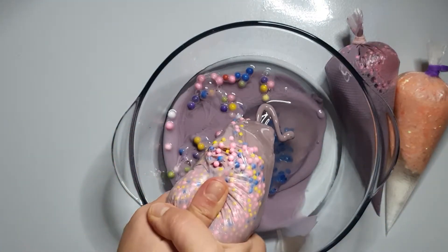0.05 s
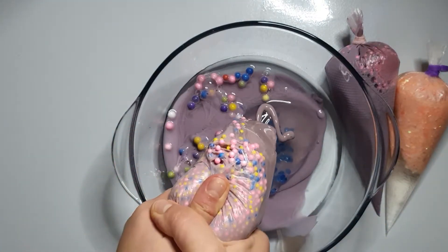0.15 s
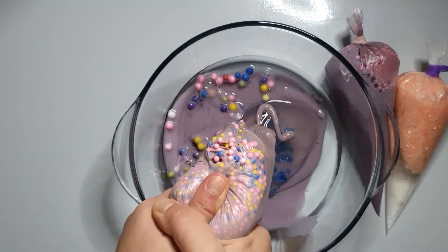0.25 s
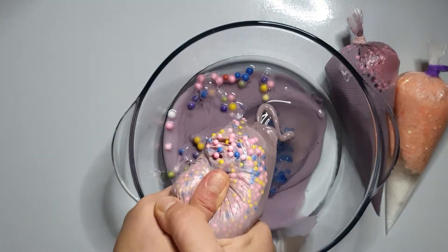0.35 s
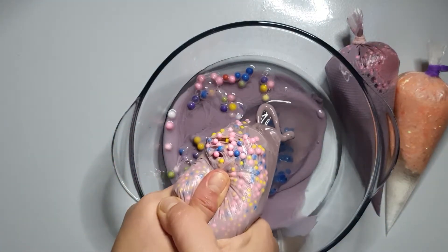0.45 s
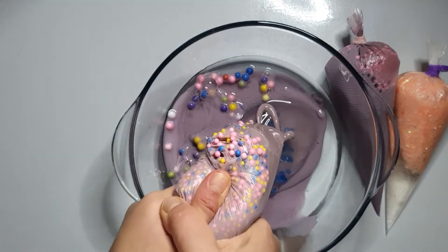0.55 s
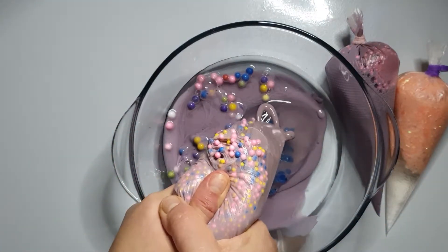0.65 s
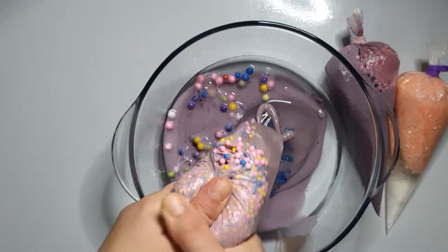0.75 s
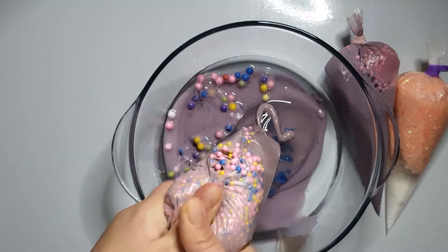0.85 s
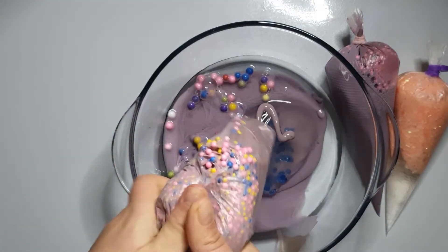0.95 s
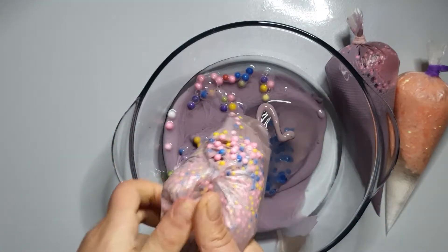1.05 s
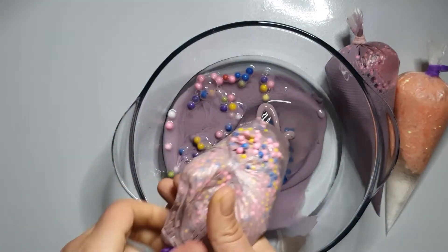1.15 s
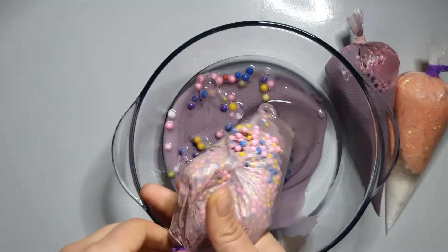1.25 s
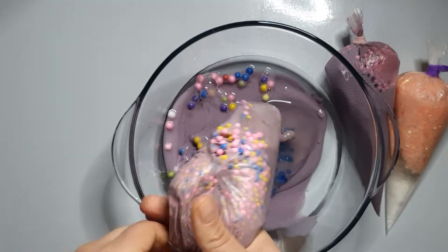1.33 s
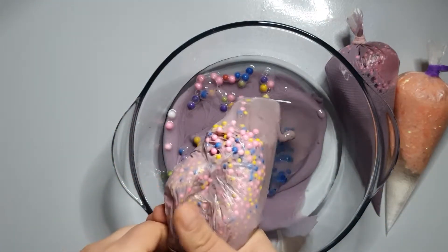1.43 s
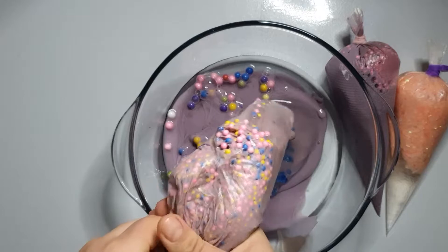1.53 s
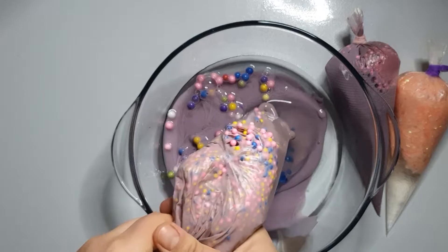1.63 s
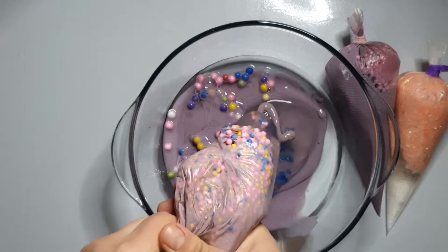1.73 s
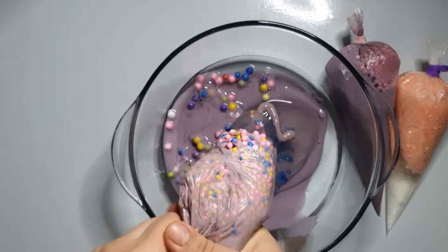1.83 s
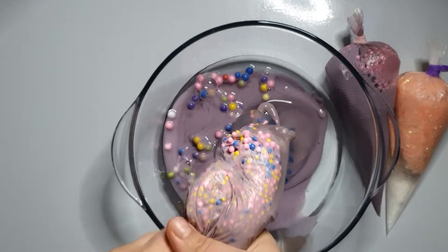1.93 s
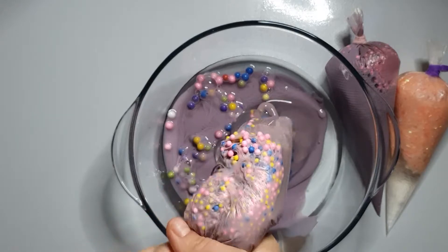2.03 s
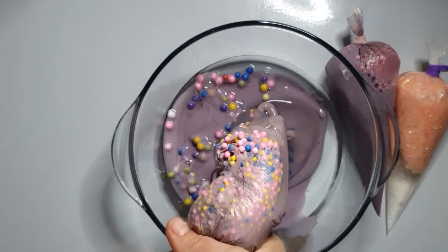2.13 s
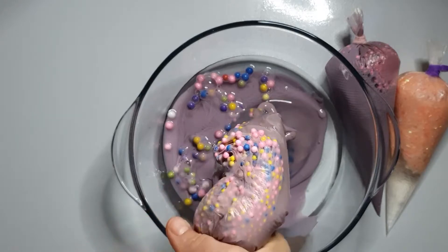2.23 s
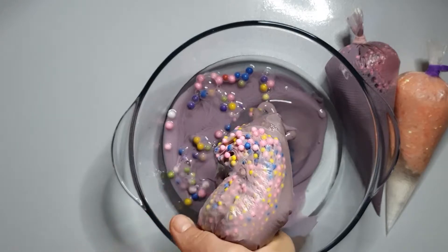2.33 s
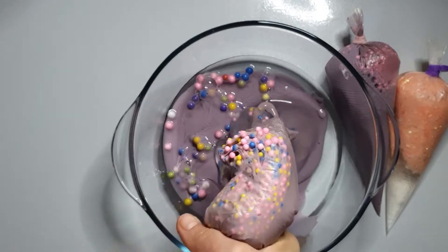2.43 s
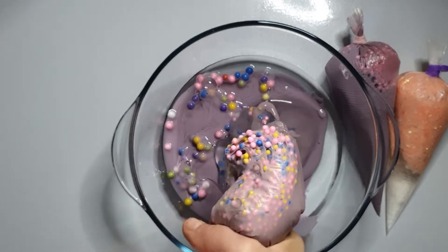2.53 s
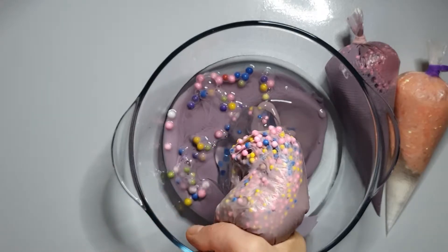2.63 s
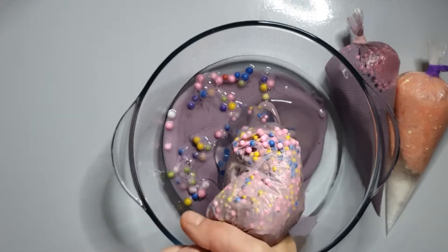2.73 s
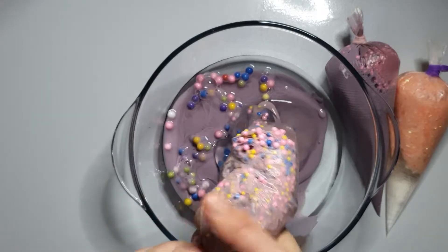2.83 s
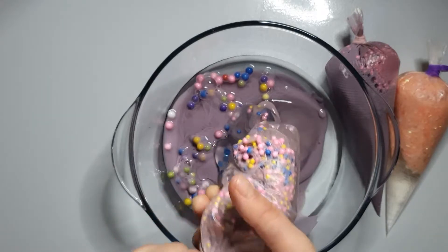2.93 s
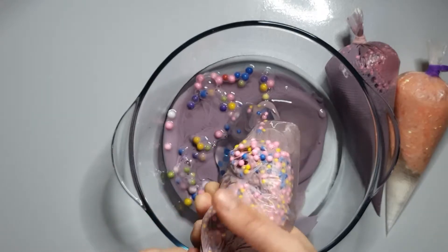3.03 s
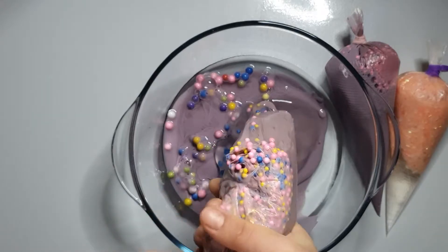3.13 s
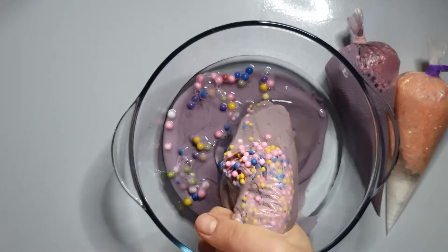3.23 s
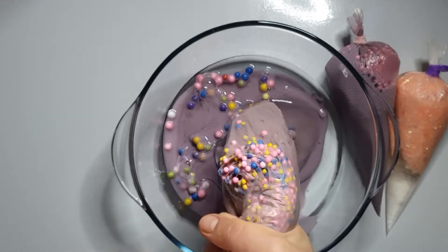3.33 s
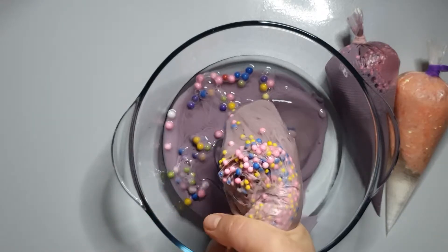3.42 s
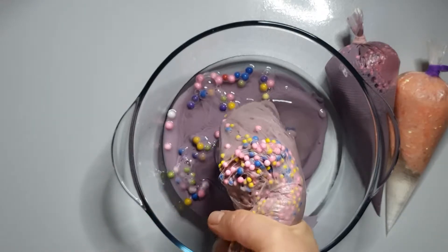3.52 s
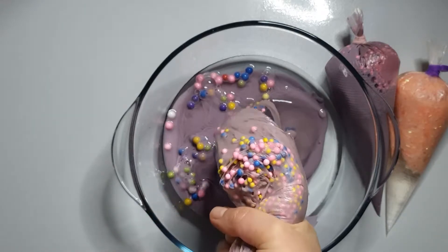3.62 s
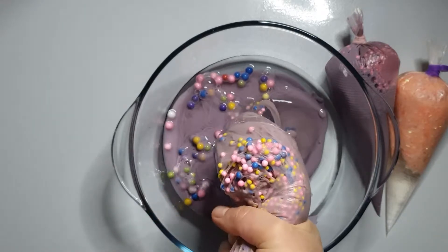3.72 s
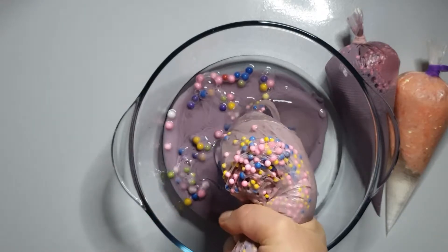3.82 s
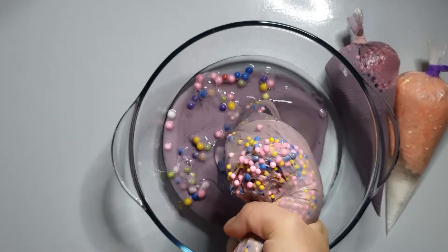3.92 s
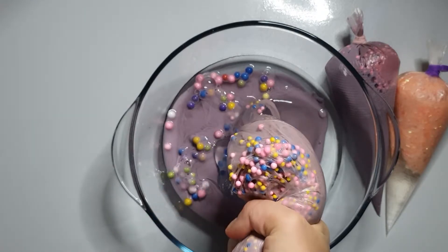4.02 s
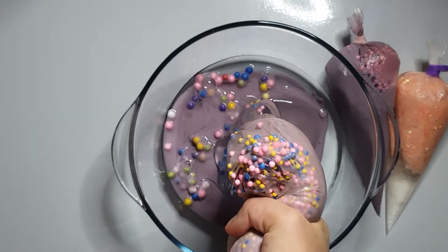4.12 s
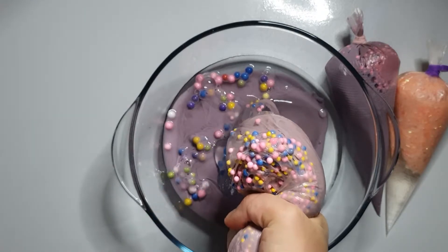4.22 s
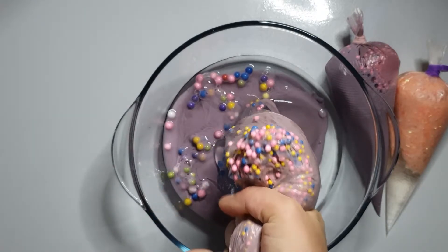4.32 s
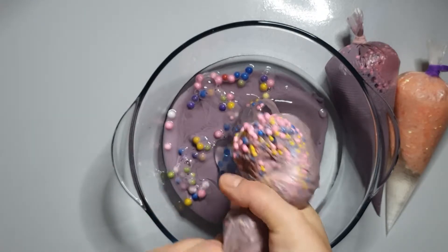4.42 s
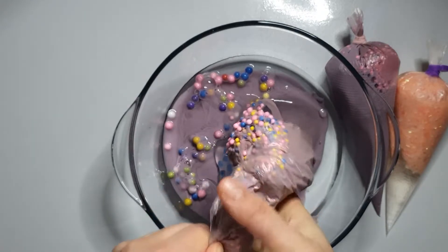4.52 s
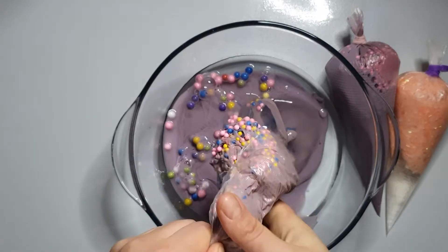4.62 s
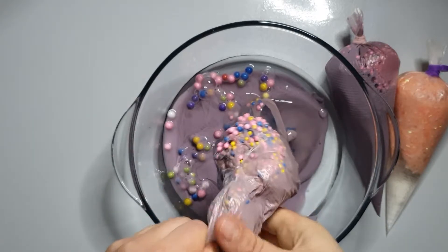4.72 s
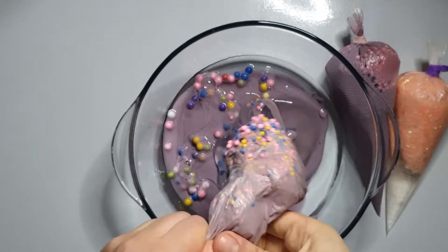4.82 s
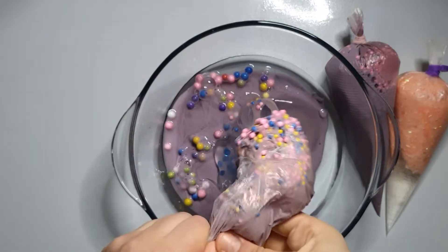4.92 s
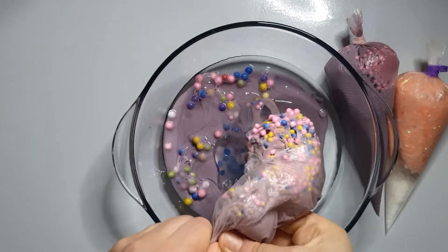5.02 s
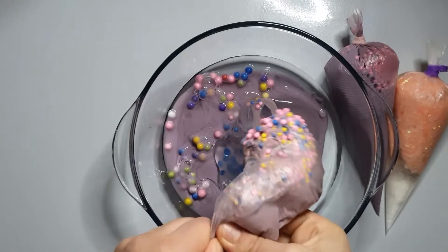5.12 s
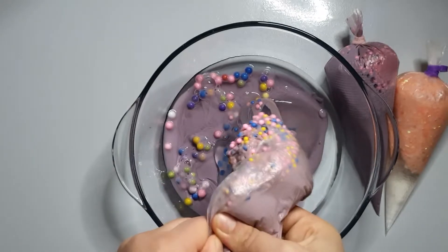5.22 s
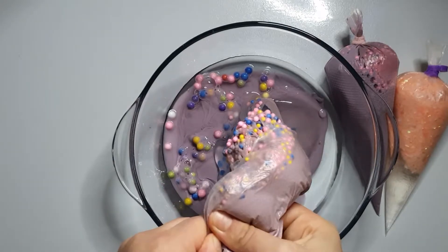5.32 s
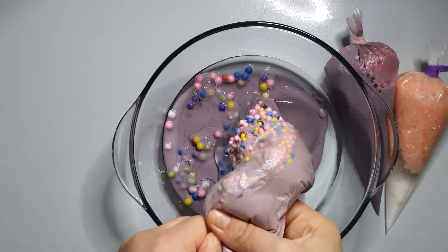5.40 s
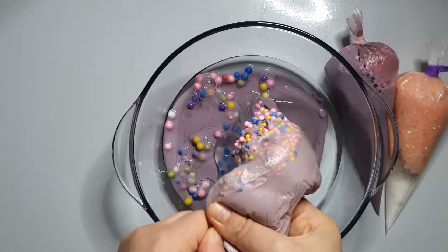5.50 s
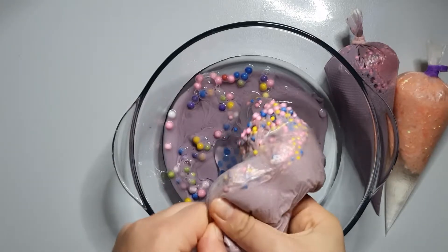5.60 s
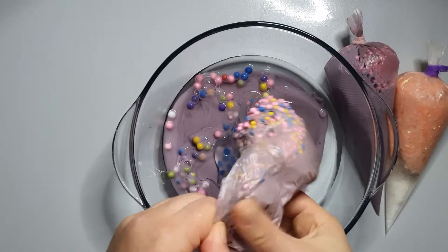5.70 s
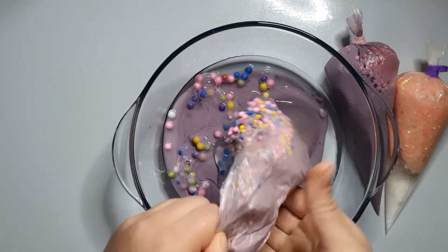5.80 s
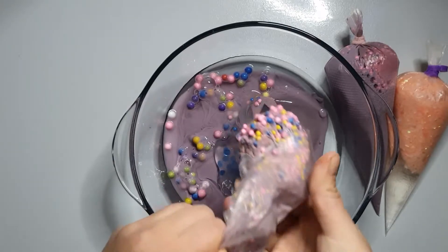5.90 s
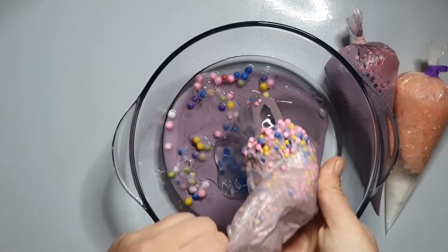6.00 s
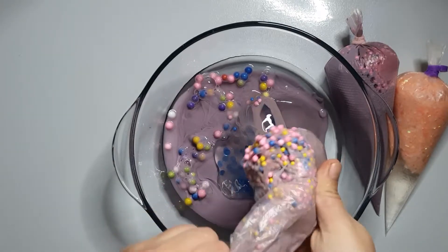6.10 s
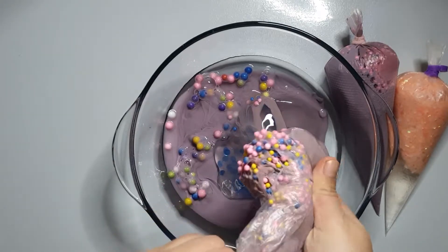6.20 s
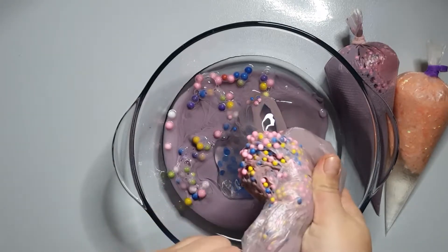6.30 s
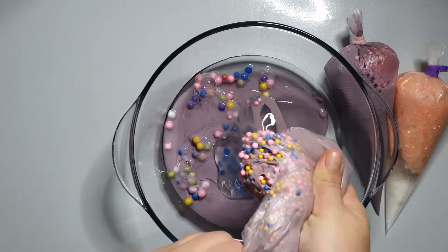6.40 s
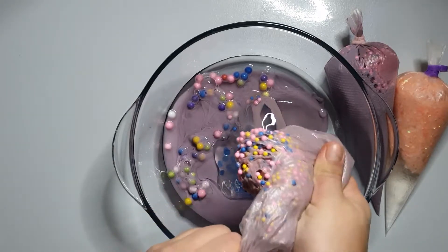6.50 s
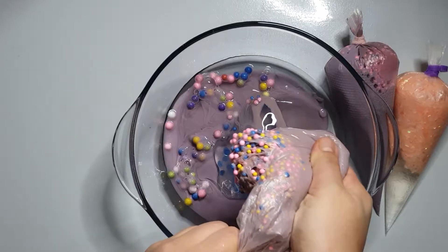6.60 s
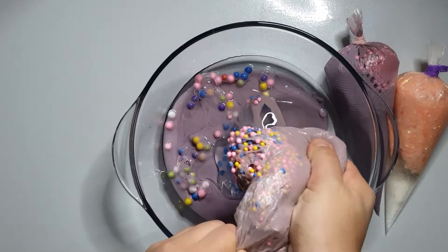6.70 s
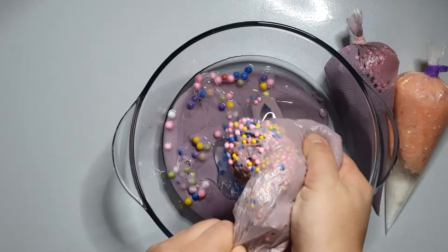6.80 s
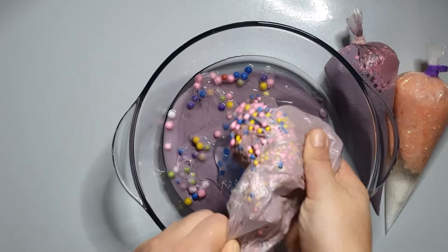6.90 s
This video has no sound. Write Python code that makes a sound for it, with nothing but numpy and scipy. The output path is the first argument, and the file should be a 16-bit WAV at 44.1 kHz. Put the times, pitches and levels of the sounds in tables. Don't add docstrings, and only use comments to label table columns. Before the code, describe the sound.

Close, crisp plastic crackling in bursts, first sparse then dense, mixed with small wet slime pops and dull soft thuds over a glass bowl.

```python
import sys
import numpy as np
from scipy import signal
from scipy.fft import rfft, irfft
from scipy.io import wavfile
from scipy.ndimage import uniform_filter1d

SR = 44100
rng = np.random.default_rng(int(sys.argv[2]) if len(sys.argv) > 2 else 0)


def transcribe(u):
    v = np.clip(np.atleast_2d(u).T, -1, 1)
    q = np.round(v * 32767).astype(np.int16)
    wavfile.write(sys.argv[1], SR, q)


def convert_level_to_amplitude(level_db):
    exponent = np.asarray(level_db, float) / 20
    return 10 ** exponent


N = 306495
LEAD_SAMPLES = 3


def rms_one(x):
    return x / np.sqrt(np.mean(x ** 2) + 1e-20)


def in_time(rows):
    s, *columns = np.transpose(rows)
    return [np.interp(np.arange(N) / SR, s, c) for c in columns]


def swells(rows):
    t = np.arange(N) / SR
    return sum(convert_level_to_amplitude(db) * np.exp(-((t - s) / length) ** 2) for s, db, length in rows)


def colour(x, points):
    size = 4096
    hz, db = np.transpose(points)
    grid = np.arange(size // 2 + 1) * SR / size + 1
    log_gain = np.interp(np.log(grid), np.log(hz), db) * np.log(10) / 20
    cepstrum = irfft(log_gain)
    cepstrum[1:size // 2] *= 2
    cepstrum[size // 2 + 1:] = 0
    impulse = irfft(np.exp(rfft(cepstrum)))
    return signal.fftconvolve(x, impulse[None], axes=1)[:, :N]


def drift(rate):
    r = np.exp(-80 * np.pi * rate / SR)
    slow = signal.lfilter([1], [1, -2 * r, r * r], rng.standard_normal(N // 40 + 2002))
    slow = slow[2000:]
    return np.interp(np.arange(N) / 40, np.arange(len(slow)), rms_one(slow))


def pair_noise(alike):
    shared, left, right = rng.standard_normal((3, N))
    alike = np.clip(alike, 0, 1)
    both = np.array([shared, np.roll(shared, LEAD_SAMPLES)])
    return np.sqrt(alike) * both + np.sqrt(1 - alike) * np.array([left, right])


def decay(clicks, ms):
    return signal.lfilter([1], [1, -np.exp(-1000 / (ms * SR))], clicks + 1e-18)


# frequency in Hz, level in dB per Hz.
ROOM_OUTLINE = [(12, -52), (20, 8.5), (71, 4.5), (265, -6.5), (341, -1), (857, -14), (1350, -7.5),
                (1500, -9.5), (1950, -11.5), (3300, -120)]
# frequency in Hz, level in dB per Hz.
FILM_OUTLINE = [(500, -45), (850, -45.5), (975, -19.5), (1570, -11), (1820, -16.5), (2550, -3.5),
                (3110, -4), (3800, 0), (7560, -4), (8450, 1.5), (10100, 0.5), (15200, -6.5), (16000, -3.5),
                (16800, -45)]


def room():
    hum_db, hiss_db = -76, -81
    hum = rms_one(colour(pair_noise(alike=0.62), ROOM_OUTLINE))
    hiss = rms_one(colour(pair_noise(alike=0.082), FILM_OUTLINE))
    return convert_level_to_amplitude(hum_db) * hum + convert_level_to_amplitude(hiss_db) * hiss


# full pressure in seconds, hold in seconds, crease bed in dB, release
# in dB per second, tightness in dB.
GRIPS = [(0.0, 0.012, -67, 47, 3), (0.276, 0.21, -62, 121, 0.5), (0.673, 0.15, -64, 100, -10),
         (0.843, 0.098, -45, 146, -1), (1.168, 0.011, -53, 81, -1), (1.363, 0.079, -51, 63, -9.5),
         (1.434, 0.024, -49, 76, 3), (1.843, 0.075, -41, 75, -3), (2.048, 0.16, -41.5, 90, -4.5),
         (2.337, 0.048, -50.5, 86, 2), (2.723, 0.049, -48.5, 24, 0.7), (3.102, 0.25, -42.5, 61, 3.5),
         (3.189, 0.03, -38.5, 60, -3), (3.885, 0.22, -61, 87, 1), (1.753, 0.048, -51.5, 80, -4),
         (3.594, 0.023, -51, 56, 1.5),
         (4.354, 0.18, -48, 84.5, 1.5), (4.414, 0.0019, -39, 98, -0.5), (4.69, 0.13, -57.5, 27, -3.5),
              (4.85, 0.097, -43.5, 300, -4), (4.978, 0.0092, -34, 116, -4.5), (5.12, 0.34, -41, 230, 1.5),
              (5.687, 0.028, -33, 164, 1.5), (5.882, 0.02, -47.5, 130, -3.5),
              (5.961, 0.003, -42.5, 313, -3), (6.11, 0.012, -34.5, 140, 1.5),
              (6.22, 0.11, -41.5, 129, -4.5), (6.463, 0.046, -49, 110, -4), (6.745, 0.1, -57, 40, -1),
              (6.87, .05, -57, 60, 7), (6.949, .01, -37, 60, 0), (4.55, 0.0051, -61, 164, 21),
              (5.625, 0.026, -46.5, 80, -2)]


def squeeze():
    press_db_per_s = 323
    t = np.arange(0, N + 40, 40) / SR
    power, tight = 1e-9, 0
    for s, hold, db, release, tight_db in GRIPS:
        closing_db = press_db_per_s * np.maximum(s - t, 0)
        opening_db = abs(release) * np.maximum(t - s - hold, 0)
        grip = convert_level_to_amplitude(2 * (db - closing_db - opening_db))
        power = power + grip
        tight = tight + tight_db * grip
    curves = (10 * np.log10(power), tight / power)
    bed_db, tight_db = [np.interp(np.arange(N) / SR, t, c) for c in curves]
    broad_db = -11 + 0.51 * tight_db + 0.28 * (bed_db + 50.5)
    return bed_db, broad_db, tight_db


def creases(bed_db, broad_db, tight_db):
    creases_per_s, clump_db, spread_db = 800, 2.5, 6.5
    busy = creases_per_s * convert_level_to_amplitude(0.12 * (bed_db + 59.5) + clump_db * drift(40))
    born = rng.random(N) < busy / SR
    size_db = spread_db * np.minimum(rng.exponential(1, N), 2.6)
    pan_db = np.outer([0.5, -0.5], rng.normal(-1.4, 3.5, N))
    clicks = []
    for share_db in [broad_db - 4.0, -5.0, -7.0, tight_db - 4.0]:
        sizes = born * convert_level_to_amplitude(size_db + rng.normal(0, 9.0, N))
        even = np.sqrt(uniform_filter1d(sizes ** 2, size=3000) * SR / 1000 + 1e-3)
        clicks.append(convert_level_to_amplitude(bed_db + share_db + pan_db) * sizes / even)
    return np.array(clicks)


# start in seconds, peak level in dB.
BROAD_BUCKLES = [(0.5156, -47), (0.8931, -28.5), (0.8996, -55), (0.9069, -34), (0.9347, -37), (1.0037, -53),
                 (1.3502, -46), (1.5044, -39.5), (1.9934, -35), (2.2319, -34), (2.3708, -36.5), (2.386, -40),
                 (2.9091, -44.5), (3.0578, -40), (3.3988, -31.5),
                 (4.4253, -21), (4.5656, -39.5), (4.9801, -27), (5.0415, -28), (5.185, -41), (5.283, -33),
              (5.6667, -38), (5.9437, -39.5), (5.9981, -37.5), (6.084, -35), (6.152, -30.5),
              (6.2207, -27.5), (6.3057, -31.5), (6.5923, -39.5), (6.7242, -44)]
WIDE_BUCKLES = [(0.515, -51), (0.865, -39), (0.8925, -40), (0.9003, -31), (0.907, -24.5), (0.926, -29),
                (0.935, -31), (1.0042, -34.5), (1.1395, -38.5), (1.3491, -39.5), (1.424, -37.5),
                (1.5087, -32.5), (1.8125, -24), (1.831, -41), (2.232, -50), (2.3242, -31), (2.4341, -45),
                (2.851, -32), (2.9098, -54), (2.935, -33.5), (3.0564, -34), (3.109, -51), (3.1937, -23.5),
                (3.3998, -47), (3.564, -43),
                (4.53, -37.5), (4.4247, -31.5), (4.8954, -23), (5.0075, -27), (5.044, -23), (5.1724, -23),
             (5.186, -22), (5.2842, -27), (5.4367, -35), (5.494, -32.5), (5.6703, -24.5), (5.674, -22),
             (5.8757, -23.5), (5.9616, -30.5), (6.0843, -38), (6.154, -22.5), (6.22, -32), (6.2441, -23.5),
             (6.305, -34), (6.4237, -28.5), (6.434, -31), (6.593, -46), (6.6993, -39.5), (6.8992, -49),
             (6.933, -29.5)]
NARROW_BUCKLES = [(.039, -53.5), (0.126, -56), (0.357, -51), (0.3906, -57), (0.644, -60), (0.925, -34),
                  (0.975, -44), (1.14, -45), (1.423, -40), (1.8235, -32), (1.831, -26.5), (2.188, -36),
                  (2.4354, -45), (2.605, -55.5), (3.1334, -40),
                  (3.9772, -38.5), (4.752, -46), (4.8026, -40), (5.2943, -29), (5.7084, -25.5),
               (6.0859, -34.5), (6.0986, -25.5), (6.307, -46), (6.426, -34), (6.6516, -39.5), (6.6998, -39),
               (6.8978, -32), (6.9314, -29.5)]
TIGHT_BUCKLES = [(0.314, -42), (0.466, -43), (0.8937, -59), (0.9077, -43), (0.9275, -28), (1.003, -38),
                 (1.1187, -41), (1.1413, -52), (1.182, -29.5), (1.35, -38.5), (1.42, -28), (1.763, -30.5),
                 (1.813, -30), (1.8303, -37), (1.9927, -20), (2.1197, -26), (2.188, -34), (2.3248, -33),
                 (2.6842, -37), (2.711, -42), (2.7981, -32), (2.8175, -28), (2.91, -27.5), (3.0262, -31),
                 (3.07, -38), (3.107, -26.5), (3.4001, -21.5), (3.4259, -22), (3.4388, -34), (3.567, -31),
                 (3.959, -31.5), (4.389, -31), (4.7521, -42.5), (4.9086, -21.5), (4.998, -18), (5.006, -19),
              (5.0432, -21.5), (5.3072, -21.5), (5.3515, -19), (5.5533, -40), (5.6667, -23.5),
              (5.809, -23.5), (5.862, -33), (5.875, -33.5), (5.9969, -29), (6.0898, -25), (6.124, -16.5),
              (6.244, -31), (6.3018, -22.5), (6.308, -23), (6.3556, -30), (6.4249, -50), (6.4366, -25.5),
              (6.65, -62), (6.6677, -29.5), (6.6996, -62), (6.7365, -35.5), (6.7461, -31.5), (6.9068, -43),
              (6.9305, -49)]
LIFT_DB = [2.44, 3.1, 6.8, 1.4]
SPILL_DB = [-16.5, -11, -3, -1]


def snaps():
    spill_per_size_db, spill_spread_db = -1.5, 3
    clicks = np.zeros((4, 2, N))
    tables = [BROAD_BUCKLES, WIDE_BUCKLES,
              NARROW_BUCKLES, TIGHT_BUCKLES]
    for size, rows in enumerate(tables):
        s, db = np.transpose(rows)
        at = (s * SR).astype(int)
        chance = rng.standard_normal((len(s), 5)).T
        pan_db = np.outer([0.5, -0.5], -0.98 + 2.5 * chance[-1])
        for k in range(len(tables)):
            spill_db = SPILL_DB[k] + spill_per_size_db * abs(k - size) + spill_spread_db * chance[k]
            gain_db = LIFT_DB[k] if k == size else spill_db
            clicks[k][:, at] += convert_level_to_amplitude(db + gain_db + pan_db)
    return clicks


# start in seconds, peak level in dB, pitch of the fold in Hz.
LESSER_BUCKLES = [(0.248, -48, 8700), (0.9007, -36, 8900), (1.194, -41, 8900), (1.336, -38, 3600),
                  (1.597, -36.5, 2650), (1.7812, -31, 2800), (1.873, -29, 11100), (1.8961, -32, 11100),
                  (2.0983, -36, 4590), (2.1487, -39, 8900), (2.161, -25, 8900), (2.2015, -24, 4485),
                  (2.8867, -31, 8900), (3.182, -28, 7100), (3.194, -29, 4560), (3.204, -25, 11100),
                  (3.213, -24, 11100), (3.228, -23, 11100), (3.3092, -23, 11100), (3.346, -27, 11100),
                  (3.63, -39, 11200), (3.664, -33.5, 11220), (3.746, -39.5, 4500), (4.3, -43.5, 8900),
               (4.587, -35, 4320), (4.8322, -28, 3630), (4.8787, -26.5, 11000), (4.944, -28, 11100),
               (4.963, -26, 11200), (4.982, -23, 11100), (5.103, -23.5, 11100), (5.218, -23, 8700),
               (5.4, -44, 2220), (5.451, -39.5, 10800), (5.6024, -36, 8900), (5.624, -42, 2230),
               (5.757, -23.5, 4496), (5.818, -23.5, 4600), (5.86, -33, 4460), (6.2145, -25, 2203),
               (6.3983, -34, 4570)]
# start in seconds, peak level in dB, pitch of the fold in Hz.
TICKS = [(0.1288, -51, 10340), (1.0058, -34, 6540), (1.1399, -42, 13000), (1.5055, -44, 8220),
         (1.762, -41, 5200), (1.811, -36, 13000), (1.98, -36, 13000), (2.0551, -35.5, 10340),
         (2.063, -46, 13000), (2.1223, -33, 8220), (2.438, -32, 5200), (2.469, -47.5, 13000),
         (2.626, -57, 13000), (2.712, -45, 13000), (3.07, -30, 13000), (3.194, -29, 10340),
         (3.223, -29, 10340), (3.3314, -30, 13000), (3.355, -31.5, 10340), (3.3695, -30, 13000),
         (3.4266, -35, 10340), (3.439, -22.5, 10340), (4.1135, -56, 13000), (4.33, -45, 10340),
         (4.807, -38.5, 10340), (4.9, -32, 13000), (4.9309, -27.5, 13000), (5.045, -44, 8300),
         (5.1185, -32.5, 10340), (5.1363, -35, 13100), (5.469, -37, 10340), (5.6921, -45, 9800),
         (6.5, -38.5, 10340), (6.5619, -40, 6540), (6.6524, -42, 6540), (6.9075, -36, 10340)]
FOLD_EDGES_HZ = [700, 2200, 4500, 7200, 17500]


def lesser_snaps():
    tick_lift_db, lift_db, db_per_octave = 7.5, -1, -2
    ticks = [(s, db + tick_lift_db, hz) for s, db, hz in TICKS]
    s, db, hz = np.transpose(LESSER_BUCKLES + ticks)
    clicks = np.zeros((4, 1, N))
    for k in range(len(clicks)):
        octaves = np.abs(np.log2(hz / np.clip(hz, *FOLD_EDGES_HZ[k:k + 2])))
        outside_db = db_per_octave * octaves - 18.5 * (octaves > 0)
        clicks[k, 0, (s * SR).astype(int)] = convert_level_to_amplitude(db + lift_db + outside_db)
    return clicks


RING_MS = [0.94, 0.7, 0.48, 0.35]
# decay in ms, then level in dB.
TAIL_MS = [11.2, 8.7, 1.5, 2.56]
TAIL_DB = [-22, -29, -11.5, -19]
ALIKE = [0.99, 0.97, 0.12, 0.2]
SPIKE_DB = [4, 5, 5, 7]
# delay in ms, level in dB.
SPIKE_ECHOES = [
    (.9, -9),
    (2.8, -15),
]
PATCH_SHARE = [0.1, 0.15, 0.099, 0.23]


def buckle(clicks, k):
    spike_lag_ms, crack_db = 0.8, -3.5
    rise_ms = 0.37
    creep_ms, creep_db = 2.28, -20
    wash_ms, wash_db = 22.2, -35.5
    noise = pair_noise(ALIKE[k])
    blows = clicks * np.sign(noise[0])
    blows[1] = np.roll(blows[1], LEAD_SAMPLES + 1)
    spike = 0
    for ms, db in [(0, 0)] + SPIKE_ECHOES:
        lag = int((spike_lag_ms + ms) * SR / 1000)
        spike = spike + convert_level_to_amplitude(SPIKE_DB[k] + db) * np.roll(blows, lag, axis=1)
    clicks = decay(clicks, rise_ms) * 1000 / (rise_ms * SR)
    creep = decay(clicks[:, ::-1], creep_ms)[:, ::-1]
    crack = decay(clicks, RING_MS[k]) + convert_level_to_amplitude(creep_db) * creep
    tail = convert_level_to_amplitude(TAIL_DB[k]) * decay(clicks, TAIL_MS[k]) + convert_level_to_amplitude(wash_db) * decay(clicks, wash_ms)
    edges = FOLD_EDGES_HZ[k:k + 2]
    band = signal.butter(2, edges, "band", fs=SR, output="sos")
    rattle = signal.sosfilt(band, spike + convert_level_to_amplitude(crack_db) * crack * noise + tail * pair_noise(alike=0.12))
    lower = signal.lfilter(*signal.butter(1, np.sqrt(np.prod(edges)), fs=SR), rattle)
    lean = np.clip(PATCH_SHARE[k] * drift(7.7), -0.9, 0.9)
    loss = np.linalg.norm(colour(signal.sosfilt(band, np.eye(1, 2048)), FILM_OUTLINE))
    return (rattle + lean * (2 * lower - rattle)) / loss


def film(clicks):
    return colour(sum(buckle(clicks[k], k) for k in range(len(clicks))), FILM_OUTLINE)


# time in seconds, squelch in dB above the crease bed.
WETNESS = [(0, -31), (.7, -26), (.9, -17.5), (2.95, -44), (3.2, -21), (3.45, -18.5), (3.7, -27),
           (5.0, -18.5), (6.0, -19), (6.95, -25)]
# centre in seconds, level in dB, length in seconds.
THUMPS = [
    (2.207, -53.5, 0.044),
    (3.302, -60, 0.16),
    (3.71, -68, 0.018),
    (5.697, -67, 0.16),
]


def slime_levels(bed_db):
    follows, lag_ms, rumble_db = 0.95, 36, -103
    wet_db, = in_time(WETNESS)
    late = decay(convert_level_to_amplitude(bed_db), lag_ms) * 1000 / (lag_ms * SR)
    squelch_db = wet_db - 52 + follows * (20 * np.log10(late + 1e-5) + 50)
    return squelch_db, 20 * np.log10(convert_level_to_amplitude(rumble_db) + swells(THUMPS))


# frequency in Hz, width in Hz, level in dB.
BOWL_MODES = [(348, 24, 2), (415.6, 12, 2.5), (486, 99, 3), (796, 11, -3.5), (574, 370, 3), (262, 740, -3)]


def slime(broad_clicks, squelch_db, rumble_db):
    jolts = decay(broad_clicks.mean(axis=0), 10.5)
    jolts = jolts / (uniform_filter1d(jolts, size=6000) + 1e-9)
    push = pair_noise(alike=0.7) * (0.5 + 0.4 * jolts)
    bowl = 0
    for k, (hz, width, db) in enumerate(BOWL_MODES):
        r = np.exp(-np.pi * width / SR)
        mode = signal.lfilter([1, 0, -1], [1, -2 * r * np.cos(2 * np.pi * hz / SR), r * r], push)
        bowl = bowl + (-1) ** k * convert_level_to_amplitude(db) * rms_one(mode)
    bowl = signal.sosfilt(signal.butter(2, 1100, fs=SR, output="sos"), bowl)
    table_band = signal.butter(2, [70, 150], "band", fs=SR, output="sos")
    table = signal.sosfilt(table_band, pair_noise(alike=0.76))
    return convert_level_to_amplitude(squelch_db - 5.5) * rms_one(bowl) + convert_level_to_amplitude(rumble_db - 9.5) * rms_one(table)


def pops(bed_db):
    pops_per_s, cycles, pop_db = 140, 23.5, -14
    at = np.flatnonzero(rng.random(N) < pops_per_s * convert_level_to_amplitude(4.0 * drift(15)) / SR)
    pitches = np.geomspace(1300, 4600, 14)
    dealt = 6 + 2.7 * drift(3.8)[at] + 4.3 * rng.standard_normal(len(at))
    dealt = np.clip(dealt, 0, len(pitches) - 1).astype(int)
    sizes = convert_level_to_amplitude(pop_db + bed_db[at] + 4.0 * np.minimum(rng.exponential(1, len(at)), 3))
    out = 0
    for k, hz in enumerate(pitches):
        clicks = np.full(N, 1e-18)
        clicks[at[dealt == k]] = sizes[dealt == k]
        r = convert_level_to_amplitude(-60 * hz / (cycles * SR))
        w = 2 * np.pi * hz / SR
        out = out + signal.lfilter([0, np.sin(w)], [1, -2 * r * np.cos(w), r * r], clicks)
    return np.array([out, np.roll(out, LEAD_SAMPLES)])


# start in seconds, peak level in dB, pitch in Hz.
WET_POPS = [(0.038, -63, 2850), (0.1985, -63.5, 2410), (0.3148, -49.5, 2750), (0.3477, -47.5, 3200),
            (0.515, -49, 3550), (0.644, -67, 2650), (0.6735, -52, 4350), (0.8236, -49, 3520),
            (0.866, -28.5, 3600), (0.9349, -39, 3630), (1.004, -28, 3450), (1.182, -46, 4700),
            (1.2112, -38, 4420), (1.2442, -53, 2680), (1.3486, -39, 2750), (1.4217, -35, 3330),
            (1.51, -37, 2570), (1.5809, -45, 3540), (1.599, -47, 2900), (1.763, -43, 4670),
            (1.8303, -40, 3570), (1.8732, -42, 2620), (1.894, -41, 2650), (1.9037, -43, 4800),
            (1.9331, -40, 3600), (2.0593, -38, 2670), (2.0858, -50, 2660), (2.0982, -29, 4780),
            (2.1461, -45, 3940), (2.1636, -28, 3300), (2.1875, -35, 4800), (2.2317, -30.5, 3460),
            (2.324, -33.5, 2920), (2.4366, -34, 4580), (2.4689, -34.5, 4840), (2.6036, -59, 2900),
            (2.6849, -49, 2600), (2.7128, -48, 3230), (2.7607, -51, 4800), (2.8176, -43, 4760),
            (2.9099, -51, 2720), (3.1069, -34, 2630), (3.2606, -39, 3570), (3.292, -32, 3940),
            (3.31, -42, 3920), (3.6332, -42, 3570), (3.961, -37, 4000), (4.1136, -57, 4770),
            (4.4404, -30, 2400), (4.4968, -45, 3960),
            (4.5706, -34.5, 2930), (4.578, -32, 3940), (4.8061, -36, 3200), (4.877, -32, 3940),
             (4.9198, -33, 4800), (4.9324, -33, 3000), (4.982, -45, 2730), (5.026, -38, 2570),
             (5.1046, -26, 4350), (5.1189, -33, 3570), (5.1583, -27, 3600), (5.204, -35, 2600),
             (5.275, -34, 2900), (5.293, -28, 3550), (5.3058, -36, 2660), (5.3454, -41, 3530),
             (5.4003, -37, 2140), (5.4132, -48.5, 3940), (5.437, -32, 3000), (5.4501, -40, 3970),
             (5.4676, -34, 3900), (5.5539, -54, 3940), (5.6015, -47, 2650), (5.6965, -27, 2620),
             (5.708, -28, 4950), (5.7193, -31, 2650), (5.7569, -35, 4370), (5.794, -33, 3180),
             (5.8096, -25.5, 4320), (5.821, -33, 3940), (5.945, -34, 3200), (5.9598, -30.5, 2530),
             (5.9695, -37, 2840), (6.098, -35, 2400), (6.1103, -36, 2360), (6.154, -33, 3900),
             (6.2129, -43, 2420), (6.2209, -36, 4100), (6.3084, -36, 4050), (6.3573, -39, 3340),
             (6.4282, -23, 3940), (6.4738, -38, 3200), (6.4974, -41, 2960), (6.504, -45, 2650),
             (6.5587, -49, 3200), (6.6663, -49, 4900), (6.7466, -31, 4860), (6.8655, -34, 4720),
             (6.8978, -27.5, 3940), (6.9487, -41, 4350)]
POPS_DEEP = [(0.196, -73, 1440), (4.931, -52, 1330), (4.992, -36, 1600), (5.034, -44, 1470),
             (5.122, -48.5, 969), (5.223, -49, 1310), (5.274, -53, 1540), (5.307, -48, 1500),
             (5.344, -63, 1475), (5.36, -49, 1280), (5.379, -52, 1610)]


def single_pops():
    cycles, rise_ms, glide, lift_db = 28, 1.3, 0.04, 8
    s, db, hz = np.transpose(WET_POPS + POPS_DEEP)[:, :, None]
    chance = rng.standard_normal((len(s), 4, 1))
    t = np.arange(900) / SR
    rise = 1 - np.exp(-(1000 * t / rise_ms) ** 2)
    shape = convert_level_to_amplitude(db + lift_db - 60 * t * hz / cycles) * rise
    turn = 2 * np.pi * hz * t * (1 + glide * chance[:, 0] * t * hz / cycles)
    second_patch = np.sin(turn * (1 + 0.13 * chance[:, 1]) + 3 * chance[:, 2])
    ring = shape * (np.sin(turn) + 0.6 * second_patch)
    pan_db = 2.5 + 4.0 * chance[:, 3]
    out = np.zeros((2, N + SR))
    for side, (lag, lean) in enumerate([(LEAD_SAMPLES, -0.5), (0, 0.5)]):
        at = (s * SR).astype(int) + lag + np.arange(len(t))
        np.add.at(out[side], at, ring * convert_level_to_amplitude(lean * pan_db))
    return out[:, :N]


# start in seconds,
# length in seconds, pitch in Hz, level in dB.
RUBS = [(0.1, 0.012, 5380, -63), (.48, 0.17, 326, -68.5), (0.925, 0.16, 436, -70.5), (0.94, 0.27, 403, -75),
        (1.349, 0.0061, 2460, -38), (.52, 0.072, 507, -80), (.7, .11, 398, -77), (.6, .28, 328, -77),
        (3.25, .08, 280, -70), (6.08, .1, 795, -67), (4.043, 0.094, 325, -75), (1.25, .25, 405, -79),
        (2.128, 0.066, 360, -69.5), (2.47, 0.13, 349, -74), (5.68, .15, 790, -65), (5.97, 0.27, 405.6, -63),
        (6.795, 0.043, 413, -69)]


def rubs():
    waver = 0.007
    warped = np.cumsum(1 + waver * drift(3.1)) / SR
    out = 0
    for s, length, hz, db in RUBS:
        shape = np.sin(np.pi * np.clip((np.arange(N) / SR - s) / length, 0, 1)) ** 2
        tone = np.sin(2 * np.pi * hz * warped) + 0.074 * np.sin(4 * np.pi * hz * warped)
        out = out + convert_level_to_amplitude(db) * shape * tone
    return out


# start in seconds, length in seconds, from Hz, to Hz, level in dB.
SQUISHES = [
    (1.517, .1, 1660, 2230, -61),
]


def squishes():
    out = 0
    for s, length, from_hz, to_hz, db in SQUISHES:
        share = np.clip((np.arange(N) / SR - s) / length, 0, 1)
        turn = 2 * np.pi * np.cumsum(from_hz + (to_hz - from_hz) * share) / SR
        out = out + convert_level_to_amplitude(db) * np.sin(np.pi * share) * drift(150) * np.sin(turn)
    return out


# centre in seconds, level in dB, length in seconds.
SIGHS = [
    (2.8, -74, 0.045),
    (3.65, -76, 0.33),
]


def pocket():
    hz, width_hz = 1290, 200
    band = signal.butter(2, [hz - width_hz / 2, hz + width_hz / 2], "band", fs=SR, output="sos")
    sigh = signal.sosfilt(band, pair_noise(alike=0.89))
    return convert_level_to_amplitude(3 * drift(37)) * swells(SIGHS) * rms_one(sigh)


# start in seconds, peak level in dB.
THUDS = [
    (4.422, -41),
    (4.563, -50.5),
    (4.979, -35.5),
    (5.673, -35.5),
    (5.76, -44),
    (6.087, -39.5),
    (6.211, -42.5),
    (6.235, -39),
]


def thuds():
    lift_db, knock_ms, ring_db = 0.5, 26.7, -6
    s, db = np.transpose(THUDS)
    clicks = np.zeros(N)
    clicks[(s * SR).astype(int)] = convert_level_to_amplitude(db + lift_db)
    knock = decay(clicks, knock_ms) * pair_noise(alike=0.87)
    rings = 0
    for hz, width, _ in BOWL_MODES[:-2]:
        rings = rings + convert_level_to_amplitude(ring_db) * signal.lfilter(*signal.iirpeak(hz, hz / width, fs=SR), knock)
    return signal.sosfilt(signal.butter(2, [330, 900], "band", fs=SR, output="sos"), knock) + rings


def scene():
    hush_ms, hush_db = 10.2, -27.5
    bed_db, broad_db, tight_db = squeeze()
    large = snaps()
    coming = decay(large.max(axis=(0, 1))[::-1], hush_ms)[::-1]
    small = creases(bed_db, broad_db, tight_db) / (1 + convert_level_to_amplitude(hush_db - bed_db) * coming)
    clicks = large + small + lesser_snaps()
    bag = film(clicks) + slime(clicks[0], *slime_levels(bed_db))
    wet = pocket() + thuds() + pops(bed_db) + single_pops() + squishes()
    return bag + room() + wet + rubs()


def gate_top(x):
    top_hz, gate_db = 13200, -70.5
    top = signal.sosfiltfilt(signal.butter(6, top_hz, "high", fs=SR, output="sos"), x)
    level_db = 10 * np.log10(uniform_filter1d(x.mean(axis=0) ** 2, size=1500) + 1e-14)
    return x - top * np.clip((gate_db - level_db) / 2, 0, 1)


def band_limit(x):
    return signal.sosfilt(signal.butter(12, 16970, fs=SR, output="sos"), x)


def record(dry):
    low_cut = signal.butter(3, 38, "high", fs=SR, output="sos")
    top_cut = signal.ellip(6, 0.5, 12, 15950, fs=SR, output="sos")
    mix = signal.sosfilt(np.vstack([low_cut, top_cut]), gate_top(dry))
    return band_limit(mix)


dry = scene()
out = record(dry)
transcribe(out)
```